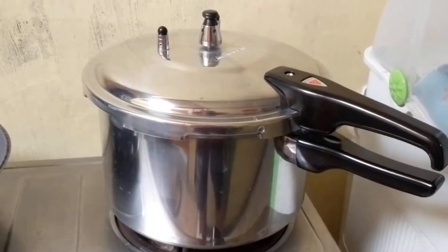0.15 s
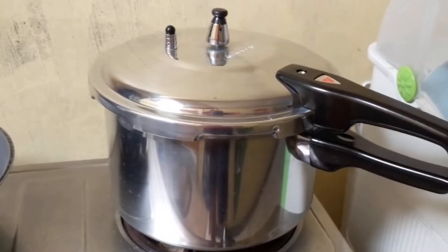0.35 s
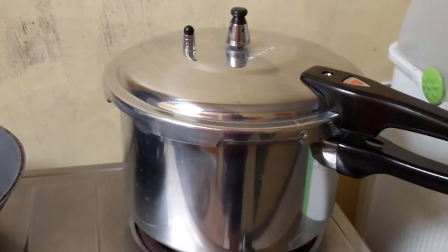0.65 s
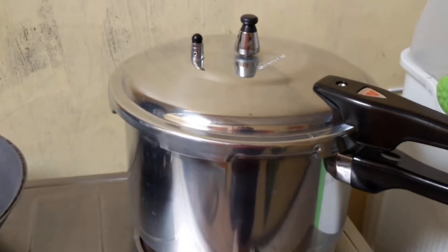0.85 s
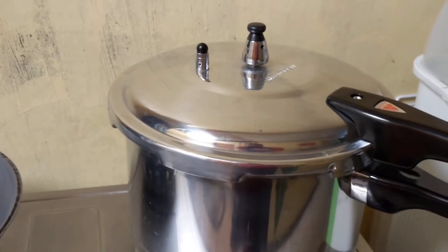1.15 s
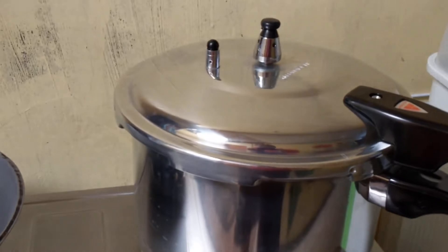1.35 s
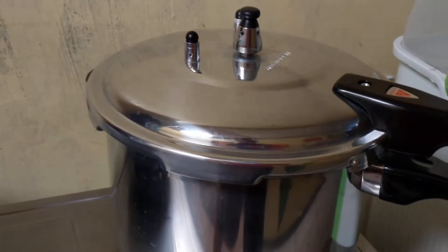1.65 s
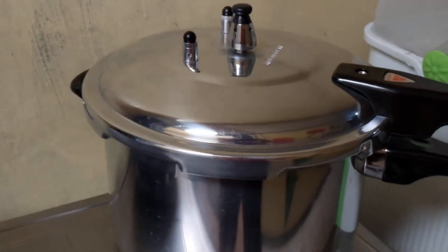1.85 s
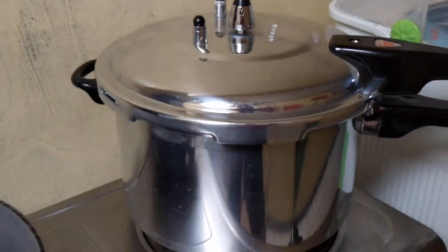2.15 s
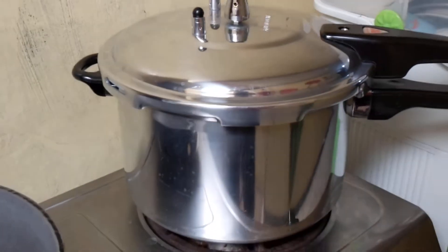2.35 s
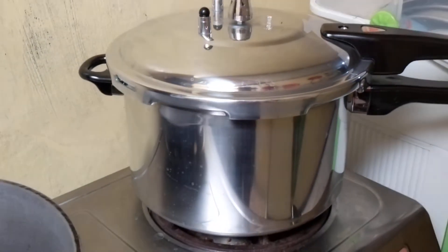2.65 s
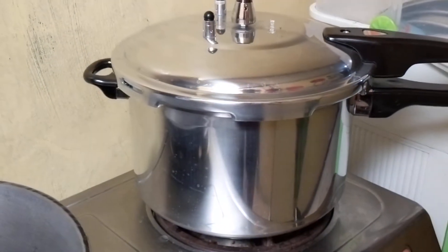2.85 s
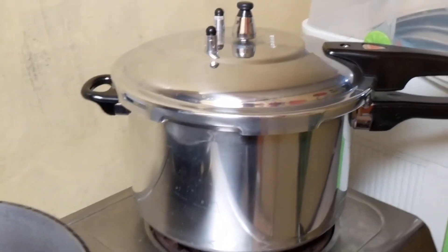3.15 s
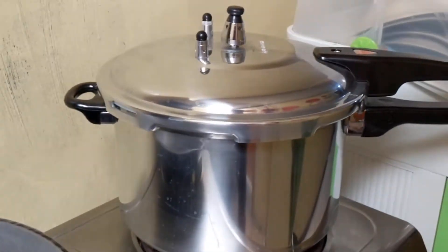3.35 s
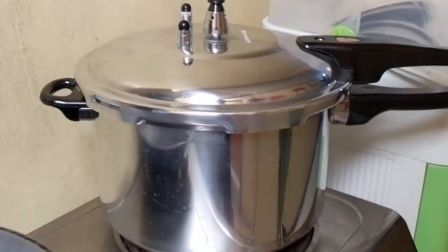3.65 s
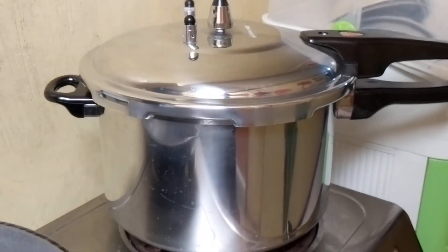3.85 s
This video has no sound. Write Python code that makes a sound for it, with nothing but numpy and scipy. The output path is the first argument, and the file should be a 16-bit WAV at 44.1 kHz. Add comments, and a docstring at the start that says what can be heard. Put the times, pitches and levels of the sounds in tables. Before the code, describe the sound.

A pressure cooker vents steam in a bright, continuous hiss that surges and sags. Faint gurgles come early, then the hiss shifts tone as the hand-held microphone moves, with soft handling bumps and a fading low kitchen hum.

```python
"""From the first moment, steam escapes under a pressure cooker's valve weight: a bright hiss that surges
and sags as the weight wobbles, over a low hum, room rumble and scattered soft handling bumps and taps.
Between 0.7 and 1.5 s water gurgles faintly in the vent. Then the hand-held microphone moves and the
hiss shifts colour, reflected all along by lid, stove and kitchen walls.
By the end the hum has faded, while the steam hisses on."""
import sys
import numpy as np
from scipy import signal
from scipy.fft import rfft, irfft, next_fast_len
from scipy.io import wavfile
from scipy.ndimage import map_coordinates

SR = 44100
rng = np.random.default_rng(int(sys.argv[2]) if len(sys.argv) > 2 else 0)


def generate_wav(signal):
    """Clip the signal to [-1, 1] and save it as 16-bit WAV at the path in sys.argv[1]."""
    frames = np.transpose(np.atleast_2d(signal))
    scaled = np.clip(frames, -1, 1) * 32767
    pcm = np.round(scaled).astype(np.int16)
    wavfile.write(sys.argv[1], SR, pcm)


N = 176400

# the ride of the steam flow through the valve (time [s], level [dB])
STEAM_FLOW = [(0.0, -36.9), (0.024, -34.5), (0.072, -41), (0.112, -35), (0.168, -37.5), (0.216, -34),
              (0.32, -39), (0.368, -35.0), (0.432, -38.5), (0.752, -36.5), (0.784, -40), (0.824, -34),
              (0.88, -38), (0.896, -34.5), (0.944, -38), (0.992, -34), (1.032, -36.5), (1.08, -34.5),
              (1.128, -38.0), (1.248, -33), (1.272, -37), (1.344, -33.5), (1.384, -38.6), (1.424, -35.2),
              (1.52, -41.5), (1.632, -36.5), (1.664, -40), (1.84, -36), (1.888, -40.5), (1.92, -33.5),
              (1.976, -38), (2.0, -33.0), (2.12, -34), (2.2, -37.5), (2.312, -34.0), (2.432, -35),
              (2.464, -39.5), (2.504, -36), (2.592, -39.5), (2.616, -41.5), (2.672, -37.5), (2.736, -35.5),
              (2.768, -41), (2.824, -35), (2.872, -41.5), (2.912, -37), (2.968, -38.5), (3.0, -41.7),
              (3.056, -35.5), (3.104, -41.5), (3.128, -38.5), (3.168, -34), (3.312, -40.5), (3.352, -35.5),
              (3.456, -38), (3.512, -35), (3.624, -36.5), (3.856, -33), (3.896, -36.5), (4.0, -33.5)]
# tone trims on the hiss as the microphone moves (time [s], low hiss [dB], fizz [dB])
HISS_TRIMS = [(0, -0.5, 1), (.6, -1.5, 0.5), (1.0, 0, 0), (1.35, -0.5, 0), (1.55, -1.5, 0.5),
              (1.85, -0.5, -2), (2.2, -4, -.5), (2.4, -2, 0.5), (2.7, 0.5, 3), (3.0, 2, 2.5),
              (3.3, 0.5, 0.5), (3.6, 3.5, 2.5), (3.76, 2, 0.5), (3.83, 2.5, 2.5), (3.9, 3.5, 1.5),
              (4, 4.5, 0)]
# the hiss's body at the first microphone position (frequency [Hz], level [dB])
LOW_HISS_FIRST = [(200, -11), (500, -23), (700, -9.5), (860, -8.5), (1080, -7.5), (1350, -3.5), (1560, -4),
                  (1800, -3), (2200, -8), (2550, 2.5), (3000, -19.5), (6000, -38)]
# the hiss's body at the second microphone position (frequency [Hz], level [dB])
LOW_HISS_SECOND = [(200, -9), (500, -15), (780, -11.5), (1000, -6), (1200, -5.5), (1420, -7.5), (1620, -4),
                   (1950, -3.5), (2270, 5), (3000, -6.5), (6000, -24)]
# the bright core of the jet (frequency [Hz], level [dB])
JET_SPECTRUM = [(900, -53), (1650, -14), (1950, -3.5), (2250, -3.5), (2700, -2.5), (3050, -5), (3600, -2.5),
                (4300, 0.5), (5100, 0.5), (6100, -5), (7000, -9.5), (10000, -36.5), (16000, -37)]
# the airy fizz on top (frequency [Hz], level [dB])
FIZZ_SPECTRUM = [(3000, -38.5), (5500, 0), (6800, -2.5), (8300, 0.5), (9800, -2.5), (10900, -4.5),
                 (11800, -13.5), (13500, -19.5), (16000, -26.5)]

def steam():
    """Three bands of jet noise ride one flow through the valve: more flow is louder and brighter."""
    move_start_s, move_end_s = 1.73, 3.44
    flow_db, = curves(STEAM_FLOW)
    low_trim_db, fizz_trim_db = curves(HISS_TRIMS)
    flutter_db = 0.46 * wobble(rate=70)  # fast unsteadiness of the jet
    surge_db = flow_db - flow_db.mean() + flutter_db
    # equal-power crossfade from one microphone position to the other
    fade, = curves([(move_start_s, 0), (move_end_s, np.pi / 2)])
    low = np.cos(fade) * noise(LOW_HISS_FIRST) + np.sin(fade) * noise(LOW_HISS_SECOND)
    # the higher the band, the harder it swings with each surge
    low *= amp(-11.5 + 0.92 * surge_db + low_trim_db)
    jet = noise(JET_SPECTRUM) * amp(-1.8 + 1.11 * surge_db)
    fizz = noise(FIZZ_SPECTRUM) * amp(-5 + 1.49 * surge_db + fizz_trim_db)
    return amp(flow_db.mean()) * (low + jet + fizz)


# watery blips in the vent (time [s], peak level [dB], pitch [Hz])
VENT_BUBBLES = [(.772, -45.5, 860), (.866, -46.5, 775), (1.112, -50.5, 770), (1.422, -50, 840)]

def gurgles():
    """Small bubbles of condensed water ring briefly in the vent."""
    out = np.zeros(N)
    for start_s, db, hz in VENT_BUBBLES:
        t, envelope = strike(start_s, rise_s=0.0068, t60=0.041)
        out += amp(db) * envelope * np.sin(2 * np.pi * hz * t)
    return out


# early reflections off lid, stove and walls (delay [ms], gain [linear])
REFLECTIONS = [(.85, 0.09), (1.45, 0.12), (2.25, 0.12), (3.2, 0.059), (4.4, 0.047), (6.1, 0.063)]

def kitchen_reflections(source):
    """Near surfaces comb the sound with drifting delays; the room tail morphs as the microphone moves."""
    sway_ms, oversample = 0.079, 4
    room_t60_s, room_db, crossfade_s = 0.14, -7.5, 0.5
    fine = signal.resample_poly(source, up=oversample, down=1)
    out = source.copy()
    for delay_ms, gain in REFLECTIONS:
        delay = (delay_ms + sway_ms * wobble(rate=2.5)) * SR / 1000  # the hand sways each path
        out += gain * np.interp((np.arange(N) - delay) * oversample, np.arange(len(fine)), fine)
    t = np.arange(N) / SR
    decay = amp(-60 * t[:SR // 4] / room_t60_s)
    for centre_s in np.arange(0, N / SR + crossfade_s, crossfade_s):  # each tail fades into the next
        tail = rng.standard_normal(len(decay)) * decay
        reverb = signal.fftconvolve(source, tail / np.linalg.norm(tail))[:N]
        fade = np.sqrt(np.maximum(1 - np.abs(t - centre_s) / crossfade_s, 0))
        out += amp(room_db) * fade * reverb
    return unit(out) * source.std()  # as loud as the dry source


# soft, low thumps on the microphone's body (time [s], peak level [dB])
MIC_BUMPS = [(0.189, -43), (.562, -39.5), (.632, -42), (1.825, -36.5), (2.192, -43), (3.1, -40),
             (3.152, -38.5), (3.875, -42)]
# light taps and brushes (time [s], peak level [dB], decay by 60 dB [s], centre [Hz])
MIC_TAPS = [(0.181, -41, 0.018, 261), (.326, -49, 0.036, 400), (1.871, -52, 0.045, 400),
            (2.184, -47, .015, 604), (2.61, -50, .05, 240), (2.626, -49, 0.12, 1010),
            (2.839, -49.5, 0.11, 900), (2.861, -51, 0.05, 503), (3.874, -51.5, .05, 600)]

def handling():
    """The hand bumps the microphone's body into a low ring and brushes it in dull puffs of noise."""
    bump_hz = 68.6
    out = np.zeros(N)
    for start_s, db in MIC_BUMPS:
        t, envelope = strike(start_s, rise_s=0.0059, t60=0.19)
        out += amp(db) * envelope * np.sin(2 * np.pi * bump_hz * t)
    for start_s, db, t60, hz in MIC_TAPS:
        _, envelope = strike(start_s, rise_s=0.002, t60=t60)
        out += amp(db) * envelope * noise([(hz / 4, -8), (hz, 0), (hz * 2, -12), (hz * 8, -60)])
    return out


# the fading low hum (time [s], fundamental level [dB], octave level [dB])
HUM_LEVELS = [(0, -48.5, -65), (.45, -52.5, -62), (.7, -44, -74), (1.0, -50, -71), (1.7, -54, -74),
              (2.0, -50, -62), (2.5, -56, -61), (3.0, -60, -63), (3.5, -64, -58), (4, -66, -62)]
# faint steady tones of the kitchen (pitch [Hz], level [dB])
KITCHEN_TONES = [(280, -73), (526, -76.5)]
# the room's dark noise bed (frequency [Hz], level [dB])
RUMBLE_SPECTRUM = [(20, -43), (38, -22), (52, -2.5), (68, 2), (90, -2), (110, -3.5), (135, -7.5),
                   (200, -15), (280, -13.5), (400, -18), (1000, -23), (4000, -42)]

def room_tone():
    """A low hum with its octave and two faint tones sit on the room's gently heaving rumble."""
    hum_hz = 55.8
    hum_db, octave_db = curves(HUM_LEVELS)
    hum = amp(hum_db) * tone(hum_hz) + amp(octave_db) * tone(2 * hum_hz)
    tones = sum(amp(db) * tone(hz) for hz, db in KITCHEN_TONES)
    rumble = amp(-56.5 + 1.75 * wobble(rate=7.65)) * noise(RUMBLE_SPECTRUM)
    return hum + tones + rumble


def tone(hz):
    """A sine of rms 1 whose phase wanders slightly."""
    t = np.arange(N) / SR
    return np.sqrt(2) * np.sin(2 * np.pi * hz * t + 0.19 * wobble(rate=4.27))


def amp(db):
    """Decibels to gain."""
    return 10 ** (np.asarray(db) / 20)


def unit(x):
    """Scale to rms 1."""
    return x / np.sqrt(np.mean(x ** 2) + 1e-20)


def curves(rows):
    """One automation curve for each column after the time."""
    times, *columns = np.transpose(rows)
    return [np.interp(np.arange(N) / SR, times, column) for column in columns]


def wobble(rate):
    """A smooth random curve, rate knots a second."""
    return map_coordinates(rng.standard_normal(1024), [np.arange(N) * rate / SR], mode="wrap")


def filtered(x, response):
    """Equalise x with a gain given as a function of frequency."""
    size = next_fast_len(N + SR // 2)
    return irfft(rfft(x, size) * response(np.fft.rfftfreq(size, 1 / SR)), size)[..., :N]


def noise(spectrum):
    """Noise of rms 1, coloured by rows of (frequency [Hz], level [dB])."""
    freqs, db = np.transpose(spectrum)
    white = rng.standard_normal(N)
    return unit(filtered(white, lambda hz: amp(np.interp(np.log(hz + 1), np.log(freqs), db))))


def strike(start_s, rise_s, t60):
    """Time since the start, and an envelope of peak 1 that rises and dies away."""
    t = np.maximum(np.arange(N) / SR - start_s, 0)
    envelope = (1 - np.exp(-t / rise_s)) * amp(-60 * t / t60)
    return t, envelope / envelope.max()


def scene():
    """The cooker up front, room tone and handling tucked under it; one microphone feeds both ears."""
    mono = kitchen_reflections(steam() + gurgles()) + room_tone() + handling()
    return np.array([mono, mono])


def record(dry):
    """A brick-wall low-pass trims the very top of the hiss."""
    return filtered(dry, lambda hz: hz < 15800)


dry = scene()
out = record(dry)
generate_wav(out)
```